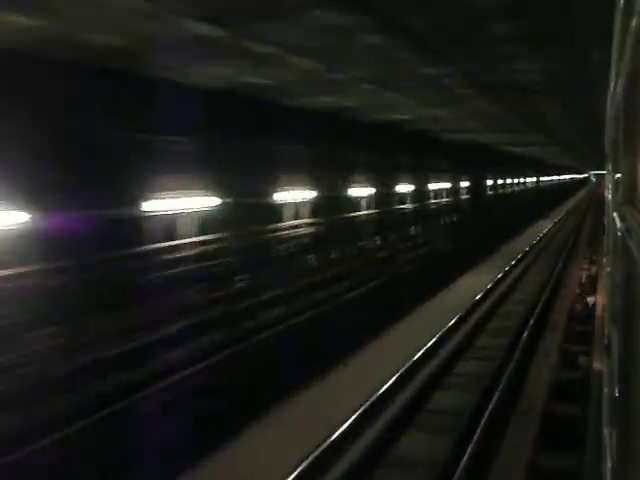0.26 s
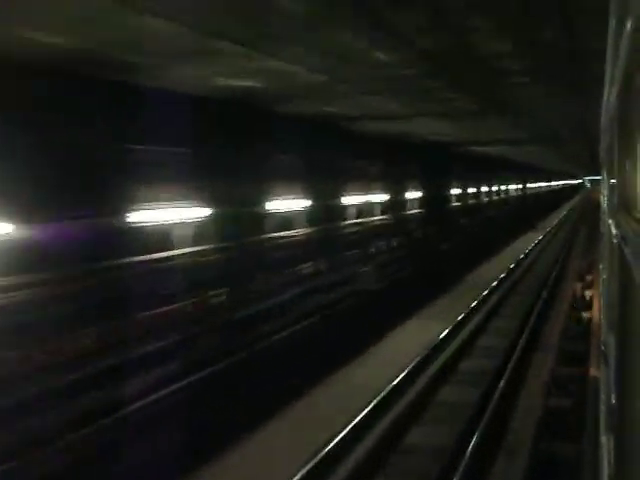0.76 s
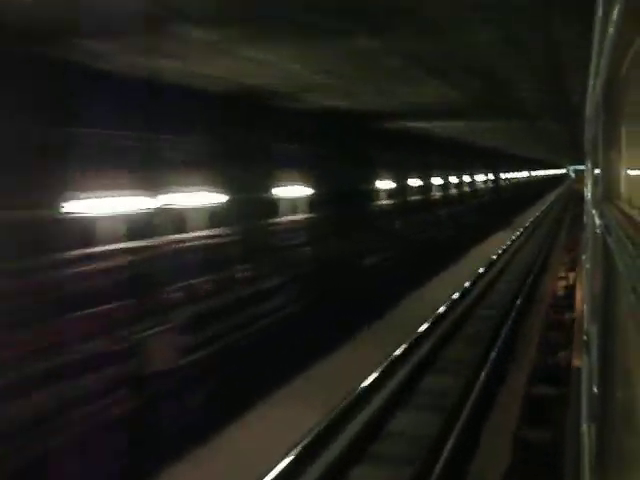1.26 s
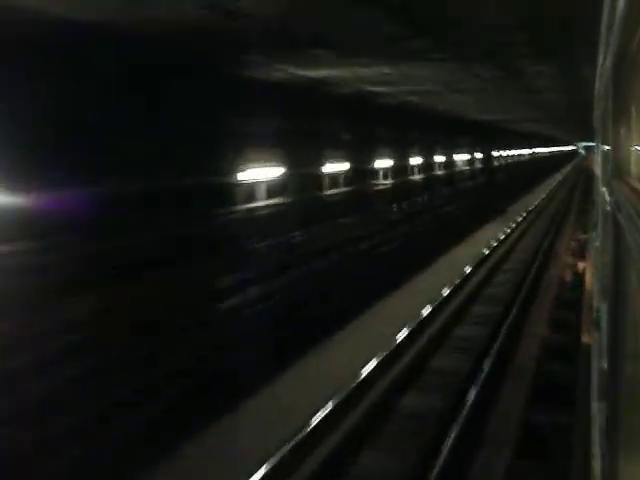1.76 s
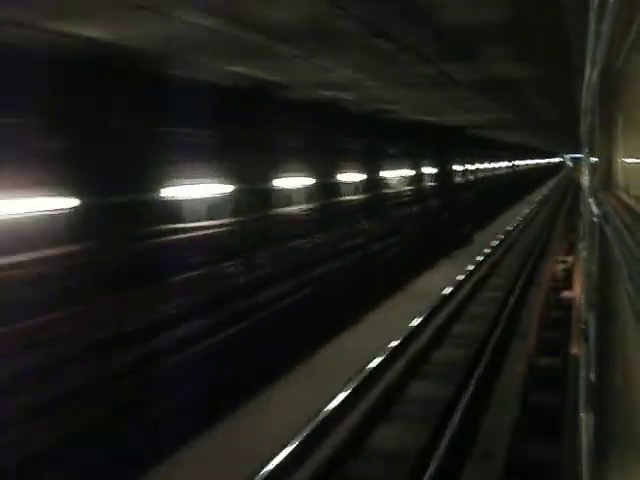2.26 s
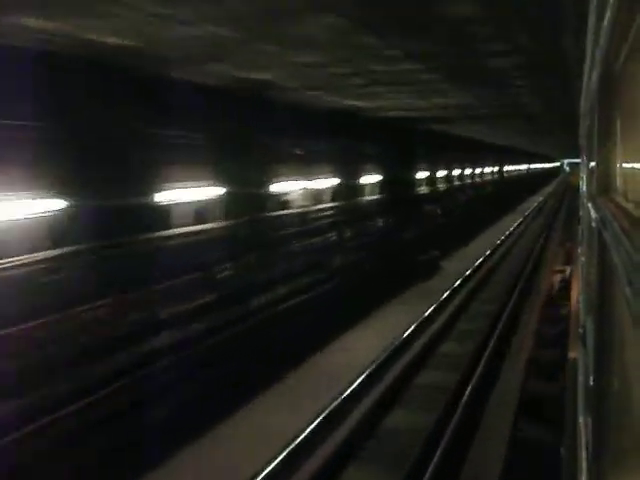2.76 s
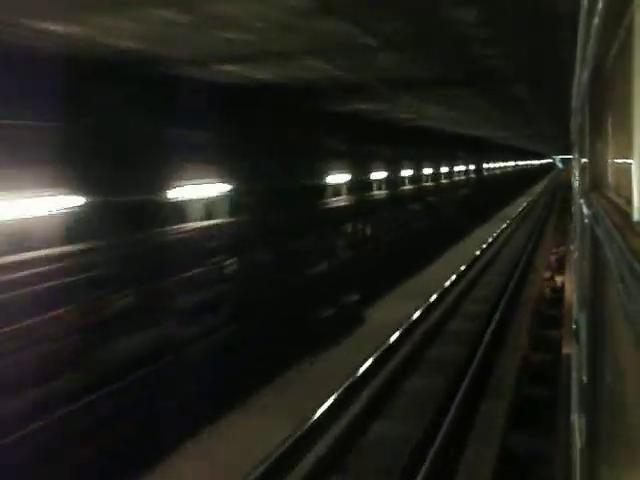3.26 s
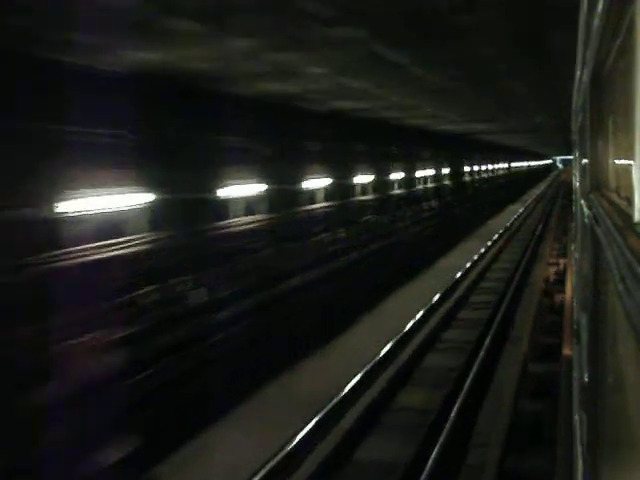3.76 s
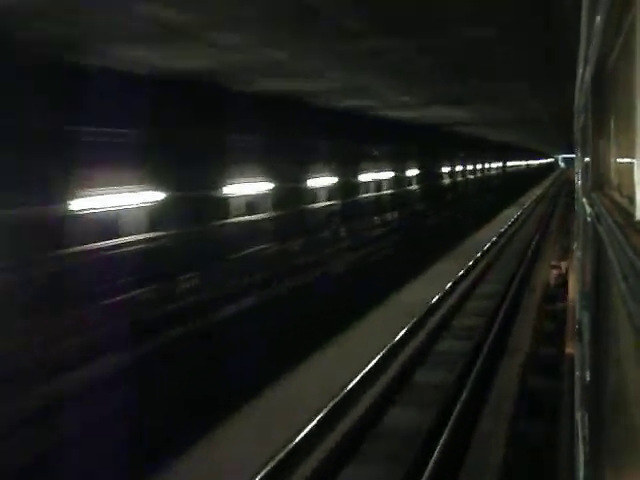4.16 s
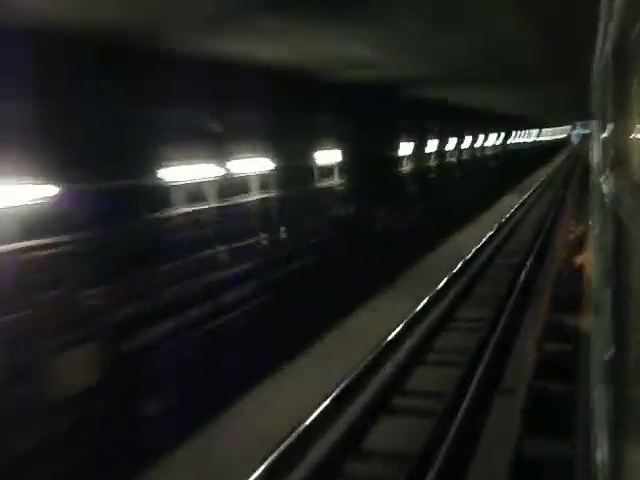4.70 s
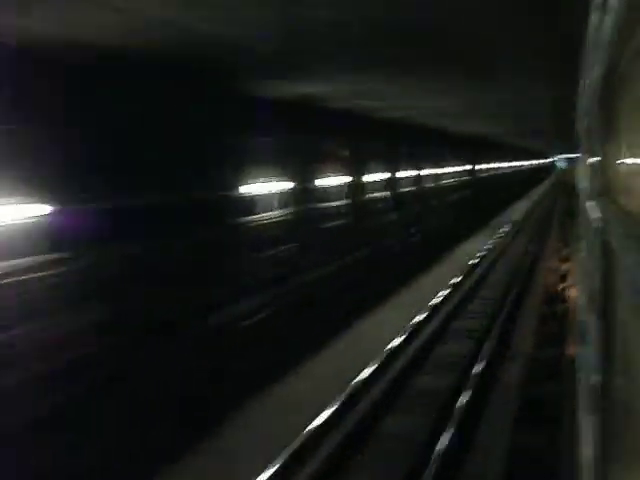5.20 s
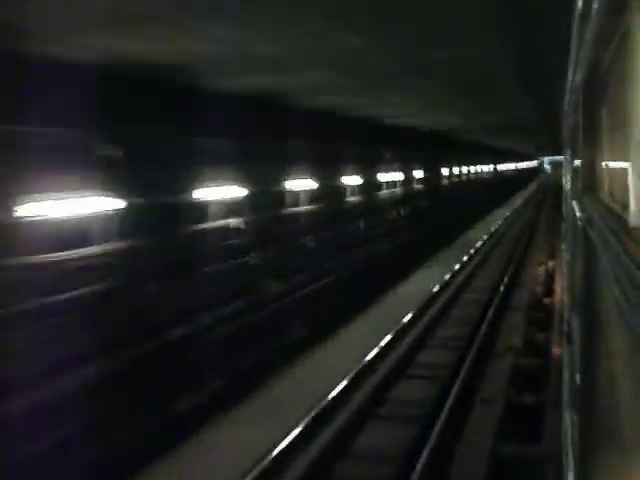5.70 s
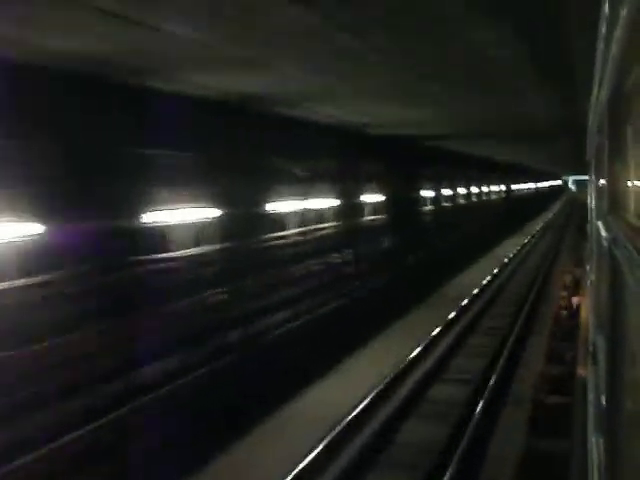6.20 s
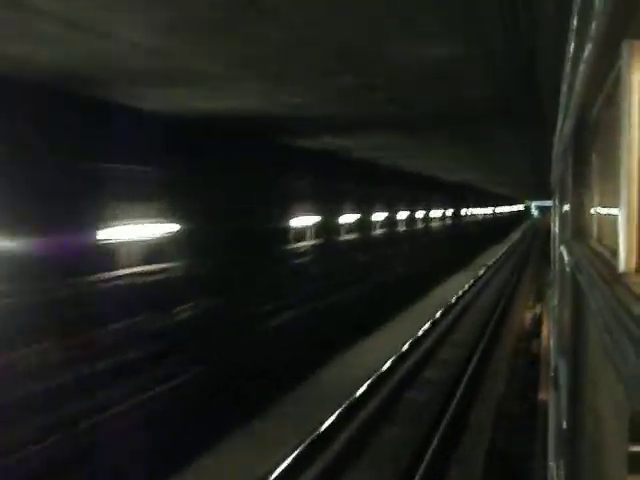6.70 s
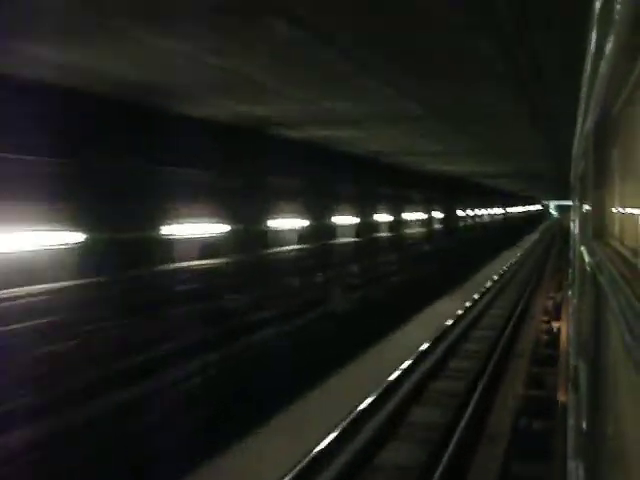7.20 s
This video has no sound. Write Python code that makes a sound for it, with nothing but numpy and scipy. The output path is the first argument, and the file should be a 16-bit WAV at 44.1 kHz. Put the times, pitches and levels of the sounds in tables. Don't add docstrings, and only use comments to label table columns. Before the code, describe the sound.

Loud, low tunnel roar of a speeding underground train, with shifting broad howls and constant wind snaps, pops and clipped thumps.

```python
import sys
import numpy as np
from scipy import signal
from scipy.fft import rfft, irfft, next_fast_len
from scipy.io import wavfile
from scipy.ndimage import uniform_filter1d

SR = 44100
rng = np.random.default_rng(int(sys.argv[2]) if len(sys.argv) > 2 else 0)


def int16_out(signal):
    q = np.round(np.clip(np.atleast_2d(signal).T, -1, 1) * 32767)
    wavfile.write(sys.argv[1], SR, q.astype(np.int16))


def magnitude_from_level(level_db):
    exponent = np.asarray(level_db, float) / 20
    return 10 ** exponent


N = 328545


def evened(x):
    return x / np.sqrt(np.mean(x ** 2) + 1e-20)


def read_spectrum(points, hz):
    f, value = np.transpose(points)
    return np.interp(np.log(hz + 1), np.log(f + 1), value)


def coloured(x, points):
    size = next_fast_len(len(x) + 4096)
    gain = magnitude_from_level(read_spectrum(points, np.fft.rfftfreq(size, 1 / SR)))
    return irfft(rfft(x, size) * gain, size)[:len(x)]


# [f/Hz, density/dB per Hz]
ROAR_SPECTRUM = [(9, -13), (18, -6), (54, 1.8), (130, -2.5), (211, -0.46), (320, -4), (420, -1.5),
                 (620, -4), (800, -8.5), (1400, -24), (2200, -25), (3000, -29), (4300, -38), (6400, -46)]
# [f/Hz, width/Hz]
HOWL_BANDS = [
    (150, 350),
    (450, 115),
    (585, 95),
    (990, 220),
]
# [level at low speed/dB, level at high speed/dB]
HOWL_LEVELS = [(-31.5, -25), (-21.5, -26), (-28, -22.5), (-27.5, -33.5)]
HOWL_PITCH_MOVE = [0, -0.039, .11, 0.15]
# [t/s, share 0-1]
SPEED_CURVE = [(0, 0), (.6, .05), (1.2, 0), (1.8, 0.3), (2.4, 0.7), (3, .8), (3.6, .55), (4.2, 0.4),
               (4.8, .85), (5.4, .7), (6, 0.9), (6.6, .95), (7.1, .85), (7.45, .8)]


def roar(patchy_db=0.71):
    roar_db, hop = -17, 256
    frames = N // hop + 5
    hz = np.fft.rfftfreq(1024, 1 / SR)[:, None]
    real, imag, patches = rng.standard_normal((frames, 513, 3)).T
    patches = uniform_filter1d(patches, size=8, axis=0)
    patches = evened(uniform_filter1d(patches, size=14, axis=1))
    speed = np.interp(np.arange(frames) * hop / SR, *np.transpose(SPEED_CURVE))

    power = magnitude_from_level(read_spectrum(ROAR_SPECTRUM, hz)) ** 2
    power = magnitude_from_level(roar_db) ** 2 * power / power.sum() * np.ones(frames)
    for (base_hz, width_hz), (slow_db, fast_db), move in zip(HOWL_BANDS, HOWL_LEVELS, HOWL_PITCH_MOVE):
        centre_hz = base_hz * (1 + move * (speed - .5))
        peak = np.exp(-2 * ((hz - centre_hz) / width_hz) ** 2)
        howl_db = slow_db + (fast_db - slow_db) * speed
        power = power + magnitude_from_level(howl_db) ** 2 * peak / peak.sum(axis=0)

    z = (real + 1j * imag) * np.sqrt(power) * magnitude_from_level(patchy_db * patches)
    sound = signal.istft(z, nperseg=1024, noverlap=768)[1][:N]
    return evened(sound) * np.sqrt(power.sum(axis=0).mean())


def buffeted(x, flutter_db=1.0):
    eddies = uniform_filter1d(rng.standard_normal(N), size=200)
    eddies = uniform_filter1d(eddies, size=200)
    return x * evened(magnitude_from_level(flutter_db * evened(eddies)))


# [f/Hz, density/dB per Hz]
SNAP_SPECTRUM = [(250, -9), (600, -4), (1100, -2), (1800, 1.5), (4200, 3.5), (5800, -4.5), (6800, -7),
                 (8000, -49)]


def bursts(s, energy_db, spread_ms, sharp_db):
    hz = np.fft.rfftfreq(512, 1 / SR)
    steps = np.arange(-256, 256)
    width_ms = 2 * np.clip(spread_ms, .05, 2)[:, None]
    envelope = np.exp(-(steps / SR * 1000 / width_ms) ** 2)
    z = rfft(rng.standard_normal((len(s), 512)) * envelope)
    z = z / np.sqrt(abs(uniform_filter1d(abs(z) ** 2, size=23, axis=1)) + 1e-12)
    tilt_db = (sharp_db[:, None] - 2.5) * np.log2(np.clip(hz, 1300, 5600) / 2800)
    z = z * magnitude_from_level(read_spectrum(SNAP_SPECTRUM, hz) + tilt_db)
    z = z / np.linalg.norm(z[:, hz > 1300], axis=1)[:, None] * 16
    gain = magnitude_from_level(energy_db) * np.sqrt(SR / 1000)
    out = np.zeros(N)
    at = np.clip(np.round(s * SR).astype(int)[:, None] + steps, 0, N - 1)
    np.add.at(out, at, irfft(z) * gain[:, None])
    return out


# [t/s, level in 1 ms/dB, spread/ms, sharpness/dB]
AIR_CRACKS = [(.4503, -13.5, 2, -10.5), (0.6383, -9, 0.76, -3.5), (.8959, -14, 0.21, -8),
              (1.1607, -15, .57, -2), (1.8173, -14, 1.5, -3), (2.3728, -18, 0.42, -10),
              (2.646, -11, 1.3, -8.5), (2.7489, -14, 2, -7), (3.3678, -14.5, 2.2, -5.5),
              (3.3879, -12.5, 2, -13), (3.9902, -10, 2, -8.5), (4.002, -17, .97, -6.5),
              (4.3802, -13.5, .87, -5), (4.6646, -15.5, 0.31, -5), (5.2948, -16, 1.3, 4.5),
              (5.4446, -19, .57, -3.5), (5.4625, -13, .61, -8), (5.533, -16, 0.77, -3.5),
              (5.5671, -16, 1.34, -3.5), (5.6516, -17.5, 0.58, -9.5), (5.7033, -15.5, 1.8, -3),
              (6.0553, -9.5, 0.36, -5), (6.0815, -18.5, 0.6, -18), (6.6005, -11, .76, -8),
              (6.639, -14.5, 1.5, -2.5), (6.7866, -14, 2, -5.5), (6.9097, -15.5, 1.1, -9),
              (7.0129, -11.5, 1, -5), (7.085, -10, 1.1, -2.5), (7.2816, -13, 0.75, -5)]
# [t/s, level in 1 ms/dB]
BRIGHT_SNAPS = [(.0403, -23), (.23, -20), (.41, -19.5), (.5079, -22), (.7857, -19), (1.262, -18.5),
                (1.597, -18), (1.6484, -18), (1.7848, -20), (1.8418, -16), (2.04, -18), (2.1282, -19),
                (2.2246, -18), (2.7263, -19.5), (2.8906, -18), (3.49, -17.5), (3.6544, -16.5),
                (4.1375, -16), (4.6949, -16.5), (4.965, -16.5), (5.0064, -18), (5.1564, -17.5),
                (5.2455, -19.5), (5.4001, -20.5), (6.0006, -17), (6.1474, -15), (6.3059, -14),
                (6.4833, -17.5), (6.7144, -17.5), (7.1614, -18)]
# [t/s, level in 1 ms/dB]
DULL_POPS = [(.2705, -20), (.5306, -19), (.6134, -15.5), (1.1971, -17), (1.4455, -18), (1.8009, -15.5),
             (1.9105, -17), (2.0589, -17), (2.2043, -17.5), (2.343, -17.5), (2.5426, -18), (2.5911, -17),
             (2.6168, -22), (3.222, -17.5), (3.3452, -19), (3.5075, -16.5), (3.5343, -17), (4.6579, -15.5),
             (4.6778, -14), (4.9474, -15), (5.0698, -18), (5.2067, -16), (5.3046, -18.5), (5.3754, -15.5),
             (5.5553, -17), (5.742, -14.5), (5.87, -16), (6.2967, -21), (7.1275, -19), (7.2699, -16.5)]
# [t/s, level in 1 ms/dB]
THIN_TICKS = [(.1992, -24), (.2892, -22.5), (.2958, -15.5), (.3407, -21), (.387, -21), (.8747, -26),
              (.9288, -26), (1.3947, -17.5), (1.9482, -21), (2.2978, -20), (2.4536, -20.5), (2.7009, -20.5),
              (3.0779, -22.5), (3.0987, -20.5), (3.1953, -25), (3.5646, -21.5), (3.8348, -23.5),
              (3.9144, -19), (4.0848, -22), (4.4607, -21), (4.6192, -21.5), (4.8346, -23), (5.03, -19.5),
              (5.3223, -22), (5.6961, -17.5), (5.7765, -21), (5.9442, -20), (6.252, -20), (7.2177, -19),
              (7.3848, -24)]
# [t/s, level in 1 ms/dB]
MUFFLED_TAPS = [(.0764, -21), (.26, -21), (.332, -18.5), (.5602, -21), (.6076, -24), (1.0946, -21.5),
                (1.1877, -19), (1.2698, -21), (1.3886, -20), (1.4259, -19.5), (1.709, -20.5), (2.004, -23),
                (2.0505, -18), (2.1105, -20.5), (2.721, -18.5), (2.7318, -19), (3.1439, -21.5),
                (3.4272, -18), (3.9098, -18), (4.024, -19.5), (4.1795, -17), (4.3687, -19), (4.4116, -20),
                (4.6078, -21.5), (5.438, -20.5), (5.711, -18), (5.7302, -15.5), (6.0721, -20.5),
                (6.4963, -20.5), (6.5506, -20.5)]


def snaps():
    out = bursts(*np.transpose(AIR_CRACKS))
    kinds = [(BRIGHT_SNAPS, 0.89, -3.4), (DULL_POPS, 1, -8), (THIN_TICKS, 0.42, -4),
             (MUFFLED_TAPS, 0.88, -10)]
    for table, spread_ms, sharp_db in kinds:
        s, energy_db = np.transpose(table)
        out = out + bursts(s, energy_db, np.full(len(s), spread_ms), np.full(len(s), sharp_db))

    strays_per_s, stray_db, stray_range_db = 9, -27.5, 5
    when, size, spread, sharp = rng.random((200, 4)).T
    live = np.arange(200) < strays_per_s * N / SR
    energy_db = stray_db + stray_range_db * size - 200 * ~live
    return out + bursts(when * N / SR, energy_db, 0.56 + .5 * spread, -14 + 13 * sharp)


def crackle(pressure, uneven_db=3.0, shaken=0.56):
    crackle_db, crackle_per_s = -33.5, 390
    when, size, spread, sharp = rng.random((3000, 4)).T
    live = np.arange(3000) < crackle_per_s * N / SR
    energy_db = crackle_db + uneven_db * np.minimum(-np.log(size), 2.6) - 200 * ~live
    swing = evened(np.sqrt(abs(uniform_filter1d(pressure ** 2, size=90))))
    grains = bursts(when * N / SR, energy_db, 0.18 + 0.37 * spread, -16 + 10 * sharp)
    return grains * swing ** shaken


def diaphragm(x):
    bent = x + .06 * (x ** 2 - np.mean(x ** 2))
    return bent / (1 + (bent / .69) ** 8) ** (1 / 8)


# [t/s, signed height/full scale, length/ms]
OVERLOAD_SURGES = [(0.0002, -0.45, 2.5), (0.2961, -0.761, 1.27), (0.7589, 0.7, 1.51), (0.9896, 0.71, 1.35),
                   (1.0566, -0.711, 1.03), (1.1608, -0.71, 0.56), (1.5971, -0.725, 0.32),
                   (1.71, -0.725, 0.63), (1.757, -0.711, 0.95), (2.0226, 0.7, 2.62), (2.2916, -0.775, 1.83),
                   (2.3219, -0.729, 2.22), (2.4865, -0.729, 1.75), (2.5477, -0.747, 0.56),
                   (2.6464, 0.741, 0.79), (2.8828, 0.853, 2.06), (3.4632, -0.797, 1.67),
                   (3.4949, 0.721, 0.71), (3.6063, 0.723, 2.22), (4.3614, 0.735, 1.9),
                   (4.6654, -0.721, 0.56), (4.89, 0.74, 0.24), (5.1244, 0.737, 1.75), (5.4644, 0.781, 2.14),
                   (5.9501, -0.709, 1.43), (6.0558, -0.717, 0.79), (6.4545, 0.716, 0.4),
                   (7.0832, 0.737, 0.24), (7.322, -0.733, 1.75), (7.4499, 0.4, 2.5)]


def surged(x):
    count, lesser_height, min_ms, max_ms = 33, .685, .5, 1.6
    when, side, long = rng.random((count, 3)).T
    heights = lesser_height * np.sign(side - .4)
    lesser = zip(when * N / SR, heights, min_ms + (max_ms - min_ms) * long)

    push, hold = np.zeros(N), np.zeros(N)
    ms = np.arange(N) / SR * 1000
    for s, height, length_ms in [*OVERLOAD_SURGES, *lesser]:
        near = slice(max(round(s * SR) - 200, 0), round(s * SR) + 200)
        u = (ms[near] - 1000 * s) / (.34 * length_ms ** .8)
        push[near] += height * (1 - .3 * u ** 2) * np.exp(-u ** 2 / 2)
        hold[near] = np.maximum(hold[near], np.exp(-(u / 1.5) ** 4))
    return (1 - hold) * x + push


def scene():
    wheels = buffeted(roar())
    air = snaps() + crackle(wheels)
    return surged(diaphragm(wheels + air))[None]


def band_limit(x):
    return signal.sosfilt(signal.butter(12, 15850, fs=SR, output="sos"), x)


# [f/Hz, level/dB]
BAND_LIMIT = [(4900, 0), (5200, -1.5), (5450, -4.5), (5700, -9), (5850, -14), (6000, -19), (6150, -25),
              (6400, -40), (7000, -70.5), (8000, -100)]


def record(dry):
    ceiling, click_s, jump, decay_samples = .705, 3.7191, -0.19, 6.0
    clipped = np.clip(coloured(dry[0], BAND_LIMIT), -ceiling, ceiling)
    after = np.arange(N) - round(click_s * SR) - .5
    step = jump / 2 * np.sign(after) * np.exp(-abs(after) / decay_samples)
    return band_limit((clipped + step)[None])


dry = scene()
out = record(dry)
int16_out(out)
```